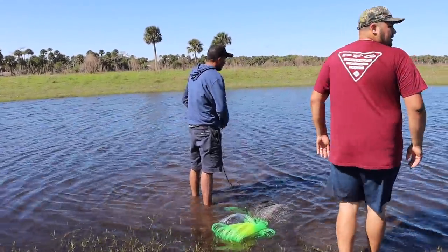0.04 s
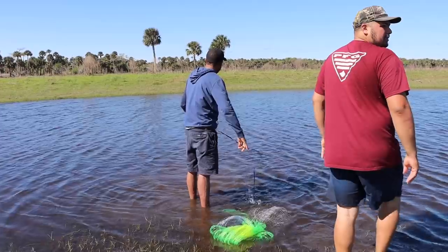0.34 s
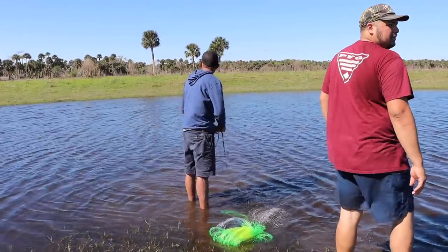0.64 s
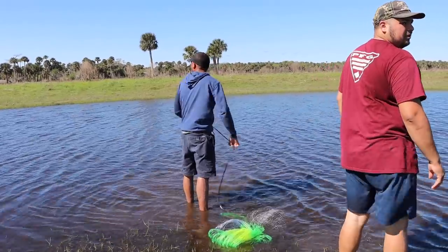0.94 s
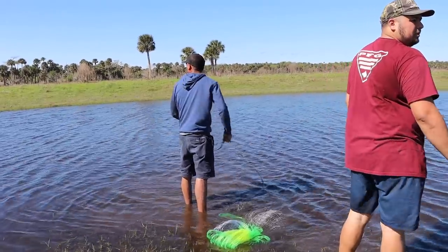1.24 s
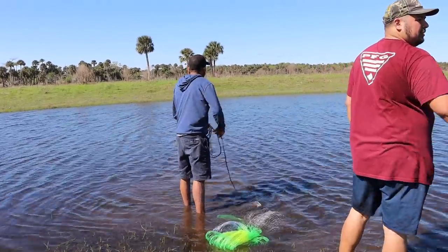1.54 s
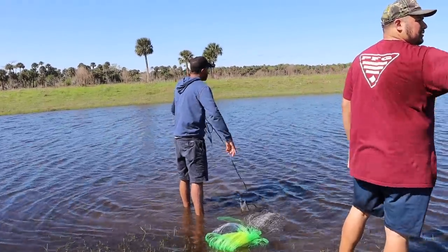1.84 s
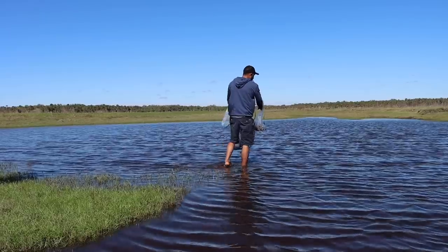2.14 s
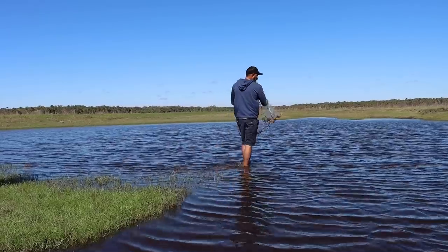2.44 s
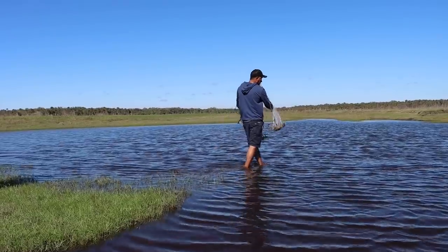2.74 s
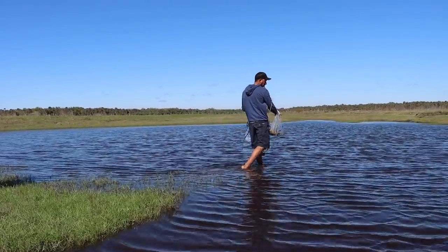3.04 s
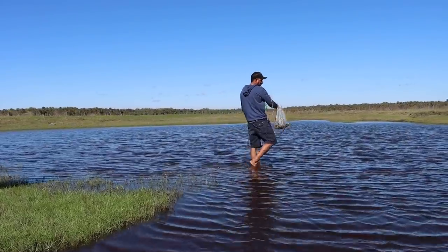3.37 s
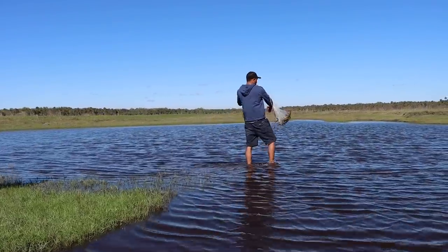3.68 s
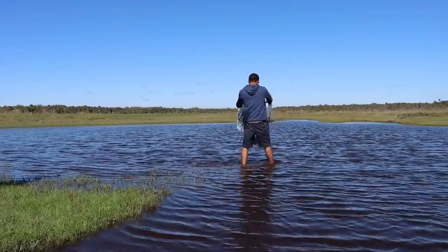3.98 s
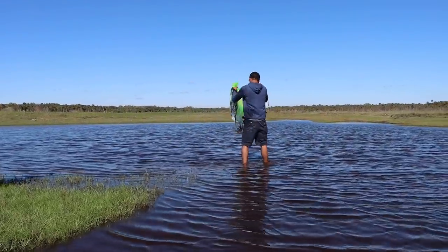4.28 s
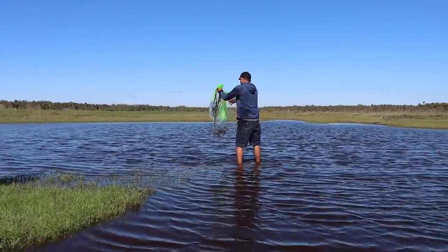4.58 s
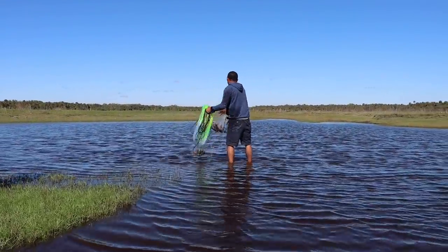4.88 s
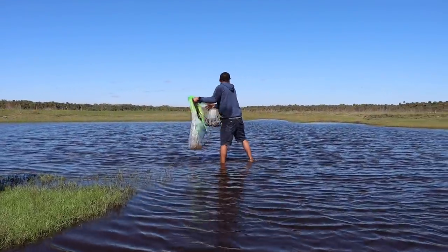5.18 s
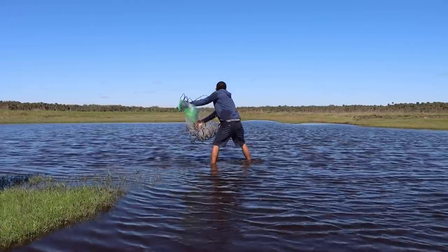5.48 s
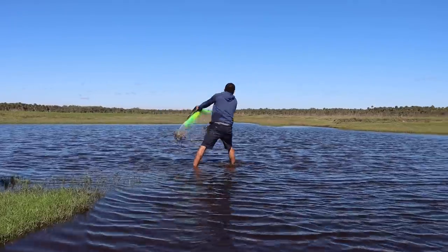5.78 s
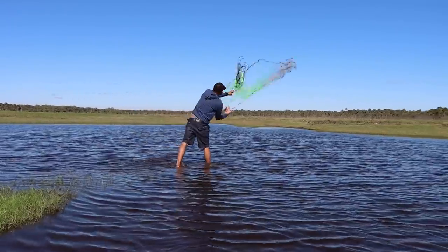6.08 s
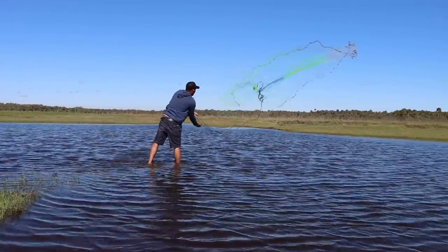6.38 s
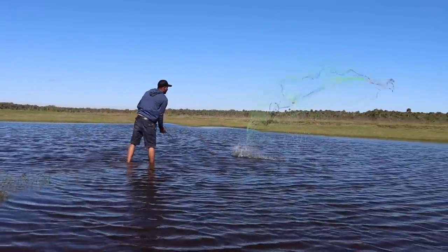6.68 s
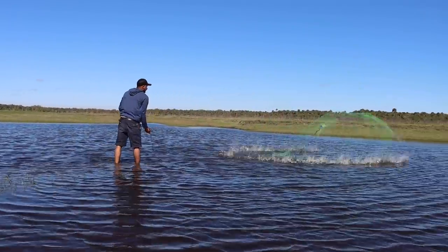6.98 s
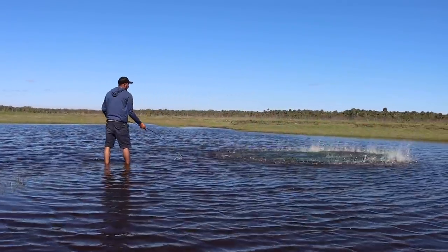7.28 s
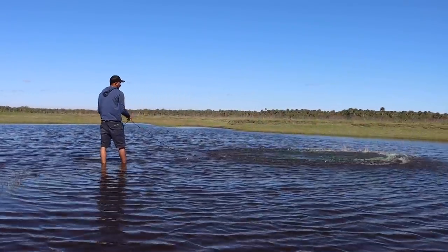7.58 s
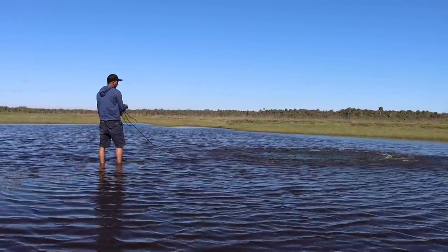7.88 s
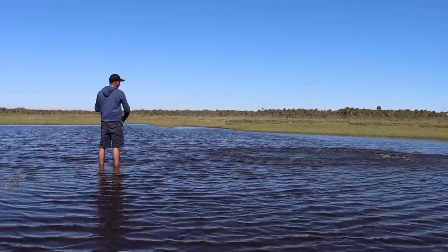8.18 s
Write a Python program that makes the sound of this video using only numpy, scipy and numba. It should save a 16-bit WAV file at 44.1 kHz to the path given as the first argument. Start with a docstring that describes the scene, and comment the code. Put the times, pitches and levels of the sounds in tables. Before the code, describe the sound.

Legs push gently through shallow water outdoors, with little splashes, plips and trickles, while gusts buffet the microphone with a low rumble. Late on, a thrown net whooshes softly through the air and hits the pond with a hissing, gulping splash, by far the loudest sound. The churning water settles quickly under the wind, with no echo.

```python
"""At a shallow pond, someone wades, swings a cast net and throws it; wind rumbles on the microphone.
Each stride stirs up droplets and air bubbles, which ring briefly like tiny bells.
The net swishes out, its lead weights pelt the water, and air pockets gulp shut behind them.
Then the spray falls back in a fading fizz."""
import sys
import numpy as np
from scipy import signal
from scipy.fft import rfft, irfft
from scipy.io import wavfile
from scipy.ndimage import uniform_filter1d
from numba import njit

SR = 44100
rng = np.random.default_rng(int(sys.argv[2]) if len(sys.argv) > 2 else 0)


def bounce(signal):
    """Save signal as a 16-bit WAV file at the path given by the first command-line argument."""
    frames = np.transpose(np.atleast_2d(signal))
    limited = np.clip(frames, -1, 1)
    pcm = np.round(limited * 32767).astype(np.int16)
    wavfile.write(sys.argv[1], SR, pcm)


N = 362534
TIME = np.arange(N) / SR

# Tone colours of the sounds and the microphone. Each row: frequency in Hz, relative level in dB.
WIND_TONE = [(15, -23), (25, -14.5), (60, -3.5), (90, -0.5), (140, -0.5), (200, -8.5), (320, -20),
             (480, -29), (800, -53.5), (2000, -70)]
AIR_TONE = [(100, 10.5), (500, -1.5), (1400, -3), (3000, -10.5), (5500, -6), (9000, -7.5), (15500, -10.5)]
SLOSH_TONE = [(150, -24), (350, -3), (700, 2.5), (1300, 0), (2200, -3), (3900, -10.5), (5500, -2.5),
              (8000, -22), (15500, -35)]
SPRAY_TONE = [(1500, -35), (3500, -1.5), (5000, -2.5), (6800, -4), (8000, -8), (12000, -9.5),
              (15500, -14.5)]
WHOOSH_TONE = [(200, -17), (520, -4), (900, -3), (1450, 2), (2400, -5.5), (3900, -9), (6000, -14),
               (15500, -48)]
CHURN_TONE = [(130, -30), (240, -5.5), (400, -6), (750, -1), (1200, -1.5), (1600, -4), (2300, -6.5),
              (3800, -14), (5500, -15.5), (8000, -28), (15500, -55)]
MICROPHONE_TONE = [(3900, 3), (4800, -6.5)]
# Wind on the microphone. Each row: time in seconds, relative level in dB.
GUSTS = [(0.0, -41), (0.38, -41.5), (1.34, -44), (1.6, -39.5), (1.9, -48), (1.92, -33), (2.06, -35.5),
         (2.68, -36), (3.8, -42), (4.2, -32), (4.34, -36.0), (4.48, -32.5), (4.84, -41), (5.5, -35),
         (5.66, -39.5), (6.02, -35.5), (6.6, -46), (6.68, -41), (7.14, -40), (7.2, -44.0), (8.22, -45)]
# A leg pushes through the water. Each row: peak time in seconds, slosh level and spray level in dB,
# build-up and settling times in seconds.
LEG_PUSHES = [(.03, -45, -47, 0.053, 0.082), (.35, -47.5, -47.5, 0.15, 0.22), (.55, -46.5, -46, 0.14, 0.14),
              (.8, -53.5, -54, 0.048, 0.045), (1.0, -54, -55, 0.087, 0.087),
              (1.56, -51.5, -59, 0.046, 0.082), (1.72, -53.5, -58.5, 0.099, .17),
              (2.14, -52, -73, 0.083, 0.39), (2.4, -49, -53.5, 0.088, 0.17), (2.66, -46, -58, 0.26, 0.32),
              (3.32, -52.5, -65, 0.069, 0.28), (3.56, -49, -65, 0.083, 0.06), (3.79, -43.5, -55, 0.2, 0.16),
              (4.0, -52.5, -60, 0.052, 0.18), (4.51, -56, -56.5, 0.23, 0.15), (4.68, -54.5, -77, 0.08, .15),
              (5.135, -49.5, -66, 0.016, 0.058), (5.39, -45, -60, 0.18, 0.074),
              (5.56, -45.5, -55, 0.084, 0.063), (5.82, -49, -53, 0.047, 0.16), (6.21, -46, -64, 0.078, 0.3),
              (8.02, -57, -58, .1, 0.23)]
# Water slides off the legs. Each row: peak time in seconds, level in dB, spread in seconds, pitch in Hz.
RUNOFF = [(.02, -45.5, 0.016, 3000), (.245, -48, 0.063, 3400), (.56, -55.5, 0.11, 3330),
          (.92, -52.5, 0.051, 3000), (1.115, -51, 0.015, 3380), (1.87, -51, 0.019, 3100),
          (5.29, -55, 0.02, 2580), (5.575, -50.5, 0.045, 3300)]
# Single air bubbles. Each row: start in seconds, pitch in Hz, level in dB, life in seconds,
# last pitch divided by first pitch.
BIG_BUBBLES = [(.105, 790, -33.5, 0.0096, 1.15), (.346, 3950, -27.5, 0.0063, 1.6),
               (.364, 990, -37.5, 0.03, 1.4), (1.018, 1040, -36.5, 0.023, 1.25),
               (1.119, 847, -43, 0.021, 3.1), (1.689, 830, -40, 0.029, 1.15), (1.711, 399, -35, .15, 5.1),
               (1.805, 804, -37, 0.026, 2.3), (1.903, 940, -32, .018, 0.39), (2.056, 2320, -45, 0.013, 1.2),
               (2.161, 3370, -38.5, 0.006, 1.5), (2.39, 1480, -34.5, 0.014, 2.5),
               (2.521, 1390, -36, .015, 1.4), (2.562, 1140, -34, .0082, 0.89),
               (2.668, 960, -26, 0.0055, 0.84), (3.55, 652, -38.5, 0.047, 1.6),
               (3.743, 1190, -35.5, 0.011, 1.4), (3.842, 1330, -30, .018, 1.9),
               (3.902, 1170, -36.5, 0.028, 2.7), (4.304, 3110, -37, 0.0045, 1.05),
               (4.433, 3600, -37, 0.0057, 1.1), (4.468, 1430, -31, 0.0079, 1.15),
               (4.469, 676, -31.5, 0.048, 3.5), (4.701, 820, -44, .024, 1), (5.135, 890, -32, 0.0083, .89),
               (5.149, 650, -31.5, 0.0087, 2.2), (5.177, 637, -33.5, 0.014, 2.4),
               (5.305, 770, -38, 0.014, 1.2), (5.326, 675, -33, 0.029, 1.25), (5.365, 464, -32, .046, 1.85),
               (5.396, 1270, -28.5, 0.024, 1.5), (5.47, 567, -36.5, 0.024, 1.4),
               (6.048, 1310, -33.5, 0.0099, 1.1), (6.196, 576, -32, 0.0255, 1.73),
               (6.272, 1470, -35, .0092, 1.2), (6.962, 390, -11, 0.0089, 1.9), (7.118, 378, -17, 0.03, .97),
               (7.275, 355, -17, 0.049, .95), (7.297, 259.6, -18.5, 0.068, 1.3),
               (8.116, 1160, -44, 0.022, 0.97)]
# Water slaps shut. Each row: start in seconds, level in dB, pitch in Hz, fade time in seconds.
WATER_SLAPS = [(.036, -34.5, 1510, 0.063), (.106, -38, 1400, .015), (.345, -30, 3000, 0.037),
               (.754, -21.5, 764, 0.016), (.797, -33.5, 516, 0.039), (1.574, -24.5, 1030, 0.028),
               (2.371, -30, 2000, .023), (2.421, -30.5, 2020, 0.033), (3.814, -24.5, 1880, 0.034),
               (3.836, -28, 2400, 0.024), (5.134, -27.5, 1300, 0.032), (5.394, -25, 1610, 0.028),
               (5.409, -23, 1500, 0.014), (6.72, -31, 3000, .036), (6.815, -16, 1110, .025),
               (6.835, -11, 1090, 0.037), (6.961, -6.5, 1100, .034), (7.066, -13, 434, 0.032),
               (7.141, -13, 900, .01), (7.157, -14, 600, .032), (7.286, -8, 900, .012)]
# Small drops hit the surface. Each row: start in seconds, relative level in dB.
DROP_TICKS = [(.5278, -26.5), (.621, -27), (1.015, -28), (1.7265, -25), (2.1914, -35), (2.5858, -28.5),
              (2.9, -25.5), (3.4435, -35.5), (6.687, -30)]
# The net rushes through the air. Each row: time in seconds, relative whoosh and hiss levels in dB.
NET_SWISH = [(5.4, -52, -78), (5.6, -57.5, -72), (5.95, -52.5, -68), (6.1, -47, -62), (6.19, -58, -56),
             (6.4, -51.5, -61.5), (6.52, -48.5, -65.5), (6.63, -56.5, -84), (6.78, -43, -78)]
# Thin whistles during the swing. Each row: start and length in seconds, first and final pitch in Hz,
# level in dB.
SWING_WHISTLES = [(5.603, 0.31, 4650, 3370, -54.5), (6.047, 0.21, 4050, 3560, -54)]
# Groups of weights sink. Each row: peak time in seconds, level in dB, spread in seconds, pitch in Hz.
WEIGHT_PLUNGES = [(6.805, -23.5, 0.0082, 625), (6.846, -20, 0.0058, 700), (6.878, -23.5, 0.007, 390),
                  (6.925, -24.5, 0.0092, 480), (7.122, -24, 0.022, 600), (7.16, -18.5, 0.013, 415),
                  (7.235, -26, 0.036, 380), (7.284, -17.5, 0.014, 810), (7.305, -26, 0.031, 338),
                  (7.545, -33, 0.034, 575)]
# Parts of the weighted rim hit the water. Each row: peak time in seconds, churn level and spray level
# in dB, build-up and settling times in seconds.
RIM_SPLASHES = [(6.72, -45.5, -37.5, 0.014, 0.025), (6.838, -23, -35.5, 0.039, 0.056),
                (6.965, -27, -36, .012, 0.028), (7.125, -32.5, -37, 0.036, 0.13),
                (7.29, -32, -33, 0.045, 0.035)]
# The thrown-up water falls back. One row, laid out like a rim splash.
FALLING_WATER = (7.5, -30.5, -38.5, 0.1361, .27)

TOP_HZ = 15800  # the recorder cuts off above this
SURGE_CURVE = 1.56  # shape of a fade: 1 is a straight line in dB, 2 is a bell


def undb(db):
    """Turn decibels into a number to multiply a sound by."""
    return 10 ** (np.asarray(db) / 20)


def unit(x):
    """Scale a sound to an average (rms) level of 1."""
    return x / np.sqrt(np.mean(x ** 2))


def envelope(rows, column=1):
    """Join a table's dB points into a volume curve, silent before and after them."""
    rows = np.array(rows)
    inside = (TIME >= rows[0, 0]) & (TIME <= rows[-1, 0])
    return undb(np.interp(TIME, rows[:, 0], rows[:, column])) * inside


def shape(x, tone):
    """Turn each frequency up or down as a tone table says."""
    hz, db = np.transpose(tone)
    all_hz = np.arange(N // 2 + 1) * SR / N
    log_gain = np.log(undb(np.interp(np.log(all_hz + 1), np.log(hz), db)))
    # keeping only the first half makes the filter ring after a sound, never before it
    cepstrum = irfft(log_gain, N) * 2 * (np.arange(N) < N // 2)
    return irfft(rfft(x) * np.exp(rfft(cepstrum)), N)


def colour(x, tone):
    """Give a sound a tone colour, at an average level of 1."""
    return unit(shape(x, tone))


def noise():
    """White noise: a plain, even hiss."""
    return rng.standard_normal(N)


def walk(rate):
    """A random curve, about 1 in size, that turns `rate` times a second."""
    size = max(int(SR / rate), 1)
    steps = np.repeat(rng.standard_normal(N // size + 1), size)
    return unit(uniform_filter1d(steps, size)[:N])


def even(x, seconds):
    """Even out level changes slower than the given time, keeping the finer grain."""
    power = np.abs(uniform_filter1d(x ** 2, int(seconds * SR) + 1))
    return x / np.sqrt(power + 1e-9)


def band(x, hz, ratio, order=2):
    """Keep the frequencies from hz / ratio to hz * ratio."""
    edges = [hz / ratio, min(hz * ratio, TOP_HZ)]
    return signal.sosfilt(signal.butter(order, edges, "band", fs=SR, output="sos"), x)


def add(out, s, sound):
    """Mix in a short sound, starting at s seconds."""
    start = max(int(s * SR), 0)
    out[start:start + len(sound)] += sound[:max(N - start, 0)]


def surge(s, build_s, settle_s, hold_s=0):
    """A volume curve that peaks at time s, holds and fades; build_s and settle_s span the top 10 dB."""
    away = np.maximum((s - TIME) / build_s, (TIME - s - hold_s) / settle_s)
    return undb(-10 * np.clip(away, 0, 20) ** SURGE_CURVE)


def surges(rows):
    """Two volume curves, for water and for spray; overlapping surges add their power."""
    power = sum(np.outer(undb([water_db, spray_db]), surge(s, build_s, settle_s)) ** 2
                for s, water_db, spray_db, build_s, settle_s in rows)
    return np.sqrt(power)


def swells(rows, ratio, order):
    """Rushes of water, each a band of noise that swells and fades."""
    out = np.zeros(N)
    for s, db, spread, hz in rows:
        rush = even(band(rng.standard_normal(SR // 2), hz, ratio, order), 0.015)
        t = TIME[:len(rush)]
        bell = np.exp(-.5 * ((t - t.mean()) / spread) ** 2)
        add(out, s - t.mean(), undb(db) * rush * bell)
    return out


def burst(hz, ratio, fade_s):
    """A sharp splat of noise that falls 60 dB in fade_s seconds."""
    t = TIME[:SR // 10]
    splat = even(band(rng.standard_normal(2 * len(t)), hz, ratio), .004)[len(t):]
    onset = 1 - np.exp(-t / 0.00025)
    return 0.57 * splat * onset * np.exp(-np.log(1000) * t / fade_s)


@njit
def bubbles(start, hz, size, life, glide, damping):
    """Each bubble rings and dies away, its pitch sliding to hz * glide as it nears the surface."""
    out = np.zeros(N)
    for k in range(len(start)):
        first, length, phase = int(start[k] * SR), life[k] * SR, 0.
        for i in range(min(int(length), N - first)):
            age = i / length
            phase += 2 * np.pi * hz[k] / SR * glide[k] ** (age ** 2.5)
            out[first + i] += size[k] * np.exp(-damping * age) * (1 - age ** 4) * np.sin(phase)
    return out


def swarm(rate, low_hz, high_hz, cycles, scatter_db):
    """Random bubbles, `rate` a second, each ringing for roughly `cycles` vibrations."""
    when, pitch, strength, ring, climb = rng.random((int(rate * N / SR), 5)).T
    hz = low_hz * (high_hz / low_hz) ** pitch
    size = hz / high_hz * undb(-scatter_db * np.log(1 - .99 * strength))
    life = cycles * 2 ** (2 * ring - 1) / hz
    return unit(bubbles(when * N / SR, hz, size, life, glide=1 + climb / 2, damping=1.96))


def wind():
    """Swirls of air buffet the microphone above a faint outdoor hiss."""
    rumble = even(colour(noise(), WIND_TONE), .08) * envelope(GUSTS) * undb(2.0 + 0.54 * walk(12))
    hiss = colour(noise(), AIR_TONE) * undb(-54 + .5 * walk(5.2))
    return rumble + hiss


def drips():
    """Stray drips plip back into the pond, thinning to silence after the strides."""
    plips = swarm(rate=45, low_hz=700, high_hz=4200, cycles=12, scatter_db=2.0)
    trails = [undb(db) * surge(s, build_s, settle_s=0.32) for s, db, _, build_s, _ in LEG_PUSHES]
    return undb(-9) * np.max(trails, axis=0) * colour(plips, SLOSH_TONE)


def washes():
    """Thin sheets of water run off the legs with a bright swish."""
    return swells(RUNOFF, ratio=1.6, order=2) * undb(2 * walk(300))


def wading():
    """Legs push through the water, stirring up ringing bubbles, crackling droplets and spray."""
    ringing = swarm(rate=460, low_hz=380, high_hz=4200, cycles=13, scatter_db=3.4)
    crackle = swarm(rate=450, low_hz=510, high_hz=7100, cycles=3.7, scatter_db=1.0)
    water = ringing + undb(-4) * crackle + undb(-6) * noise()
    spurts = undb(2.0 * walk(90))  # the water breaks in quick little spurts
    slosh = even(colour(water, SLOSH_TONE) * spurts, 0.085)
    droplets = swarm(rate=610, low_hz=3020, high_hz=13900, cycles=18, scatter_db=3.5)
    spray = even(colour(droplets + noise(), SPRAY_TONE) * spurts, 0.14)
    slosh_volume, spray_volume = surges(LEG_PUSHES)
    lapping = undb(1.6 * walk(28))
    return (slosh * slosh_volume + spray * spray_volume) * lapping


def plops():
    """Larger pockets of air pinch off with a wet click and ring out, wobbling as they rise."""
    s, hz, db, life, glide = np.array(BIG_BUBBLES).T.copy()
    wobble = undb(1.6 * walk(400))
    out = bubbles(s, hz, undb(db), life, glide, damping=1.08) * wobble
    for start, pitch, level_db in zip(s, hz, db):
        click = burst(1.2 * pitch, ratio=1.6, fade_s=.018)
        add(out, start, undb(level_db - 8.0) * click)
    return out


def slaps():
    """Water claps against legs and net, and flung drops tick back onto the surface."""
    out = np.zeros(N)
    for s, db, hz, fade_s in WATER_SLAPS:
        add(out, s, undb(db) * burst(hz, ratio=1.66, fade_s=fade_s))
    for s, db in DROP_TICKS:
        add(out, s, undb(db + 4.5) * burst(5330, ratio=1.42, fade_s=0.0089))
    return out


def whistles():
    """During the swing, thin whistles swell and fade while their unsteady pitch sinks."""
    out = np.zeros(N)
    glide_s = 0.041
    for s, length, first_hz, final_hz, db in SWING_WHISTLES:
        t = TIME[:int(length * SR)]
        pitch = final_hz + (first_hz - final_hz) * np.exp(-t / glide_s)
        pitch *= 1 + .008 * walk(400)[:len(t)]
        volume = undb(db) * np.sqrt(np.sin(np.pi * t / length))
        add(out, s, volume * np.sin(2 * np.pi * np.cumsum(pitch) / SR))
    return out * undb(2.3 * walk(80))


def throw():
    """The net whooshes and hisses as it rushes through the air and opens."""
    flutter = undb(1.3 * walk(70))
    whoosh = colour(noise(), WHOOSH_TONE) * envelope(NET_SWISH)
    hiss = unit(band(noise(), 8500, ratio=7.0, order=1)) * undb(11.0 + 2.2 * walk(150))
    return (whoosh + hiss * envelope(NET_SWISH, column=2)) * flutter


def plunges():
    """Lead weights drag air under, and the pockets collapse with low gulps."""
    return swells(WEIGHT_PLUNGES, ratio=1.43, order=3)


def landing():
    """Weights and mesh tear the surface into short-lived bubbles and a fine spray, which falls back."""
    impacts = swarm(rate=1400, low_hz=220, high_hz=6000, cycles=2.8, scatter_db=-1.0)
    foam = swarm(rate=1200, low_hz=283.2, high_hz=5110, cycles=15.2, scatter_db=1.0)
    churn = even(colour(impacts + foam + noise() / 2, CHURN_TONE), 0.032)
    drops = swarm(rate=3500, low_hz=2930, high_hz=14900, cycles=4.9, scatter_db=3.0)
    spray = colour(drops + noise(), SPRAY_TONE)
    # the level holds while the mesh lands, from its near edge to its far edge
    land_s, hold_s, settle_s = 6.805, 0.51, 0.26
    mesh_churn = undb(-28) * surge(land_s, build_s=0.023, settle_s=settle_s, hold_s=hold_s)
    mesh_spray = undb(-37) * surge(land_s, build_s=.06, settle_s=settle_s, hold_s=hold_s)
    splash_churn, splash_spray = surges(RIM_SPLASHES + [FALLING_WATER])
    return churn * np.hypot(mesh_churn, splash_churn) + spray * np.hypot(mesh_spray, splash_spray)


def scene():
    """Open water gives no echo, so the sounds simply add up in one channel."""
    pond = wind() + wading() + washes() + drips() + plops() + slaps()
    net = throw() + whistles() + landing() + plunges()
    return (pond + net)[None]


def record(dry):
    """The microphone dulls the treble, and the recorder cuts off the very top."""
    top_cut = signal.ellip(10, .2, 80, TOP_HZ, fs=SR, output="sos")
    return signal.sosfilt(top_cut, shape(dry, MICROPHONE_TONE))


dry = scene()
out = record(dry)
bounce(out)
```